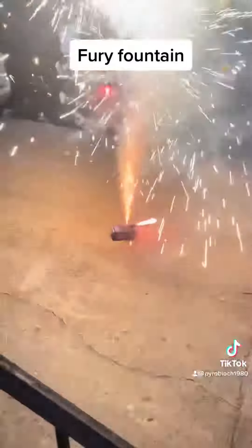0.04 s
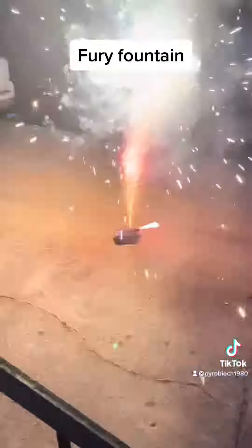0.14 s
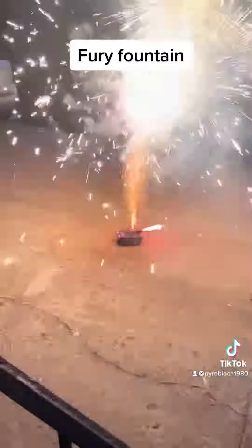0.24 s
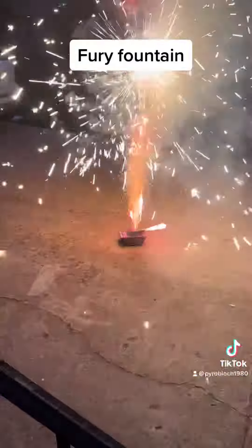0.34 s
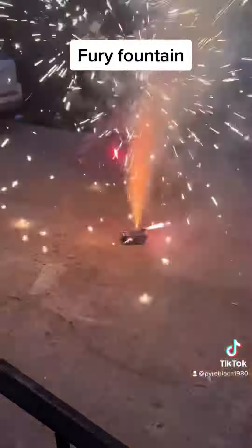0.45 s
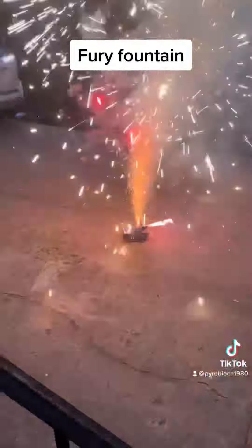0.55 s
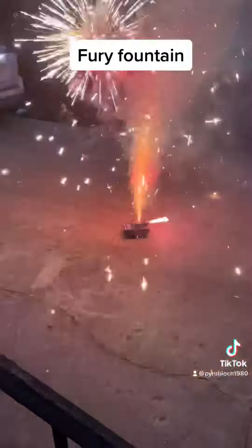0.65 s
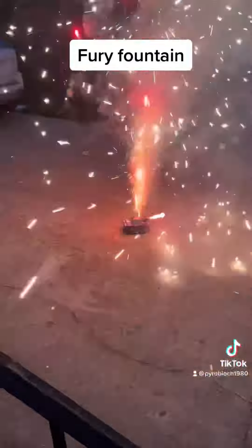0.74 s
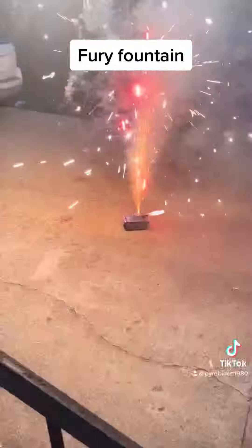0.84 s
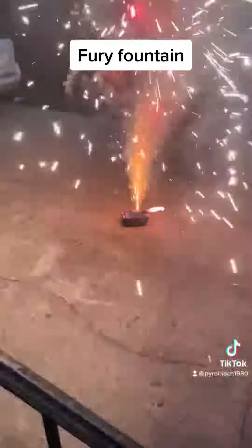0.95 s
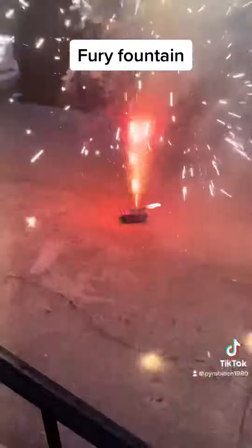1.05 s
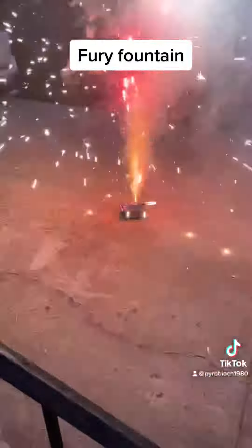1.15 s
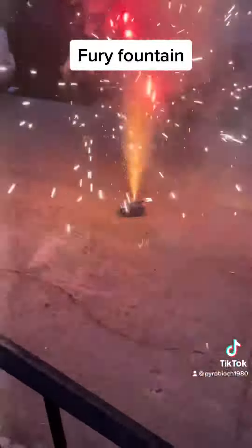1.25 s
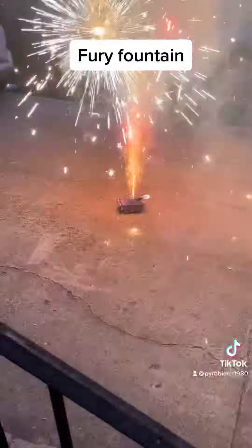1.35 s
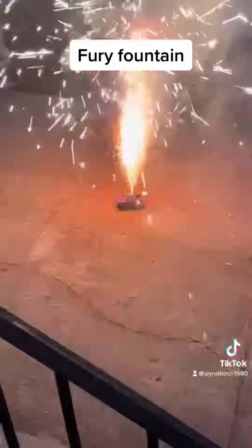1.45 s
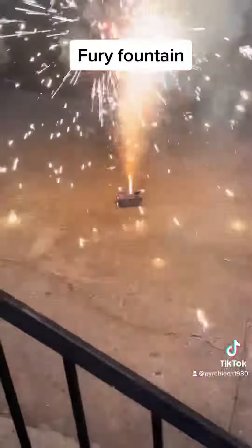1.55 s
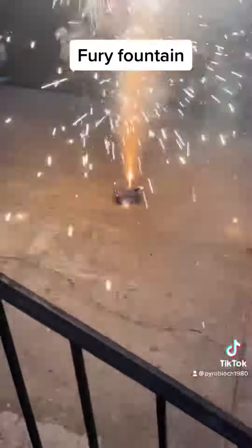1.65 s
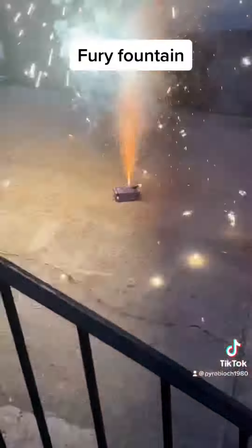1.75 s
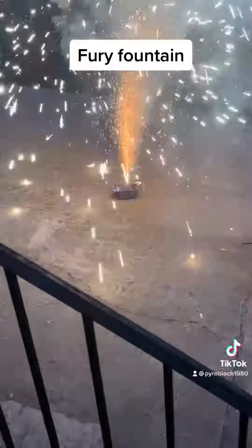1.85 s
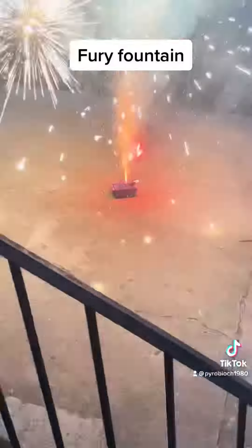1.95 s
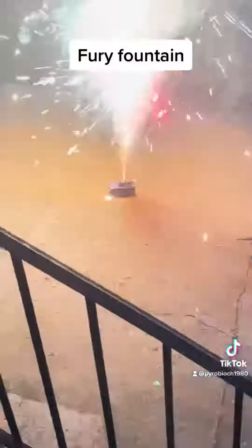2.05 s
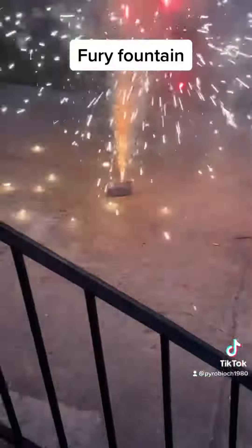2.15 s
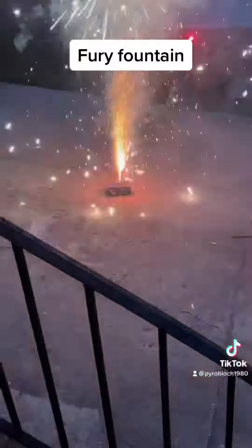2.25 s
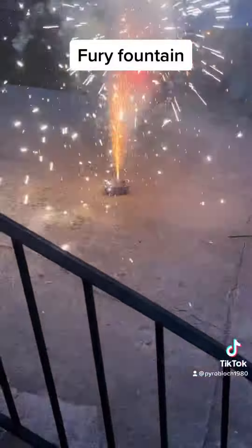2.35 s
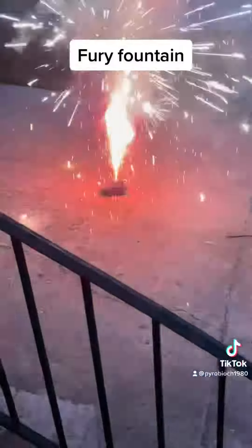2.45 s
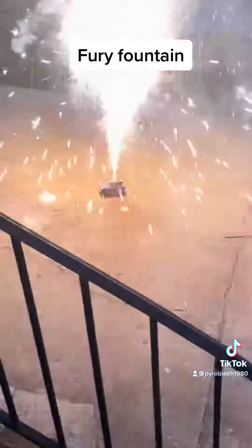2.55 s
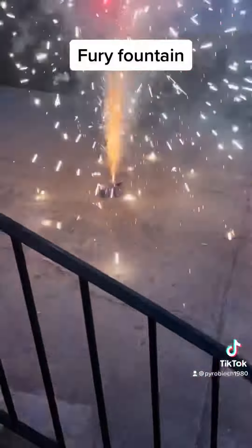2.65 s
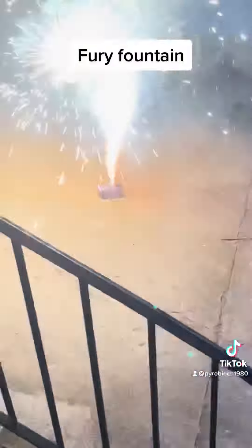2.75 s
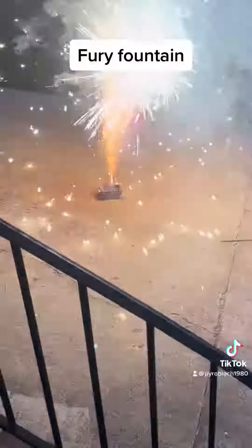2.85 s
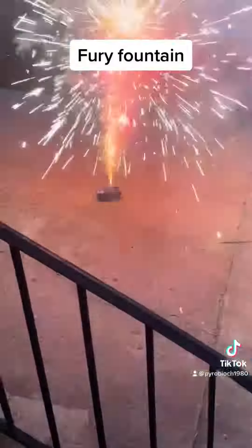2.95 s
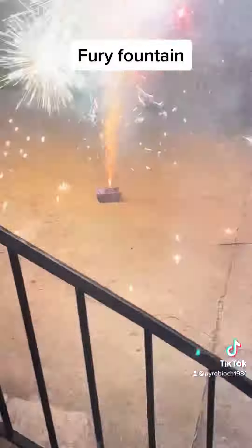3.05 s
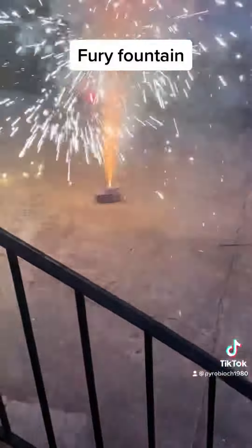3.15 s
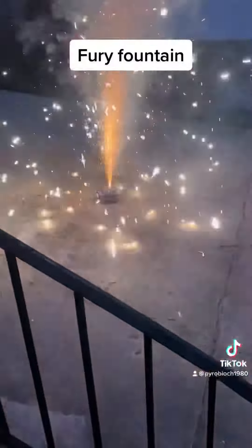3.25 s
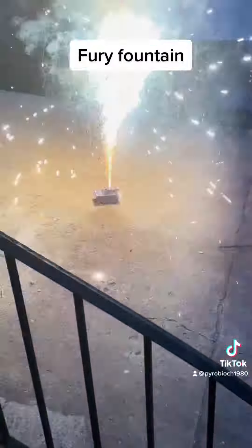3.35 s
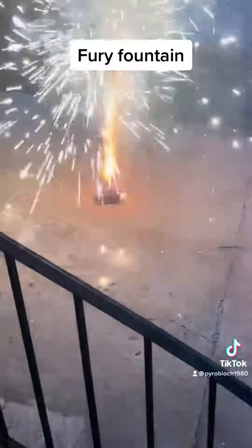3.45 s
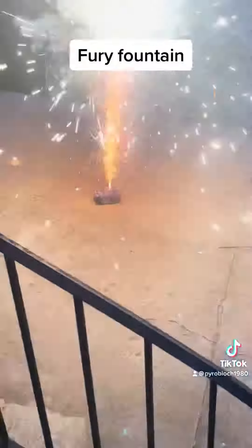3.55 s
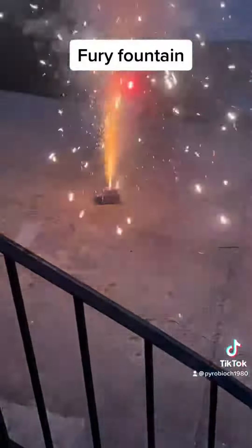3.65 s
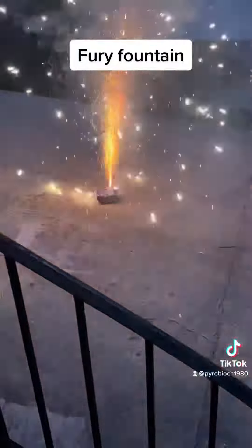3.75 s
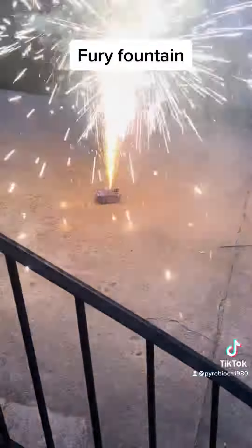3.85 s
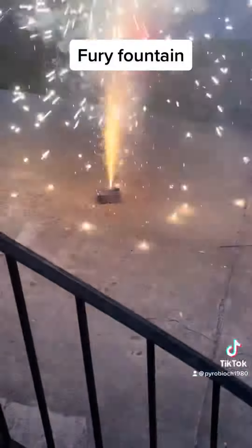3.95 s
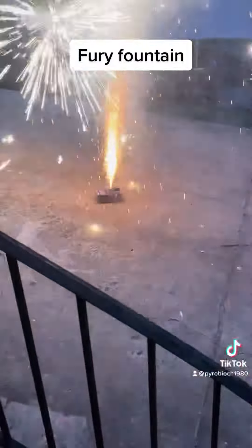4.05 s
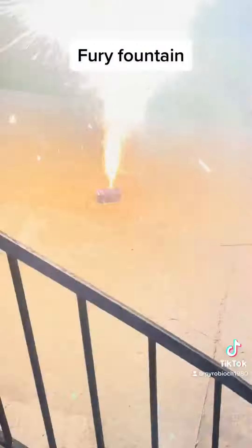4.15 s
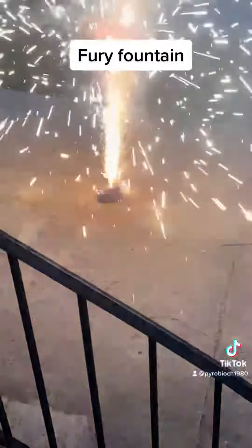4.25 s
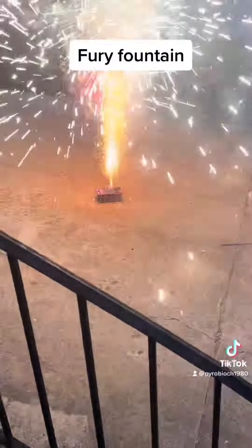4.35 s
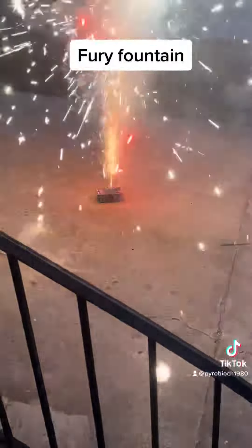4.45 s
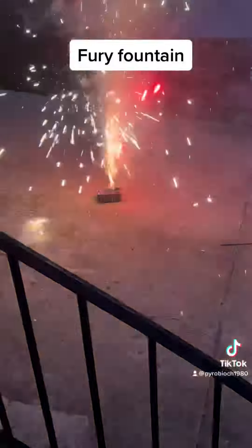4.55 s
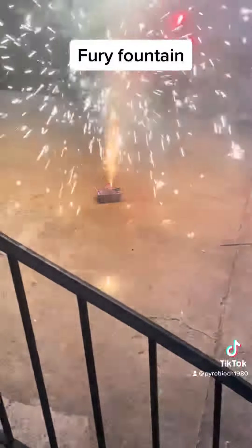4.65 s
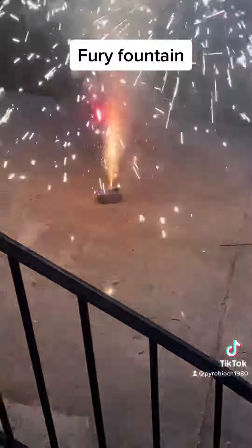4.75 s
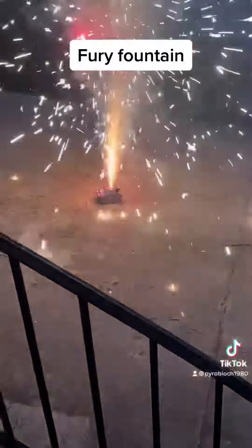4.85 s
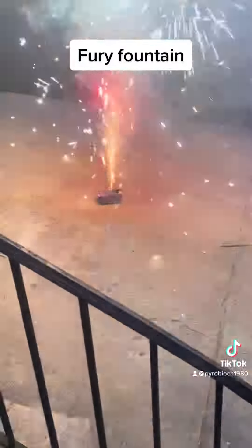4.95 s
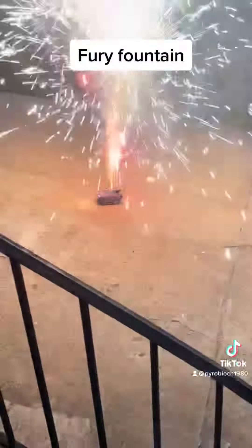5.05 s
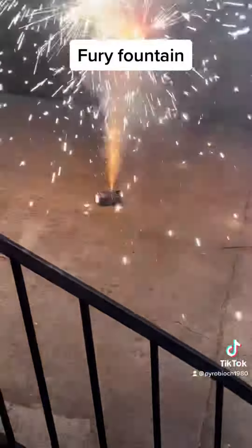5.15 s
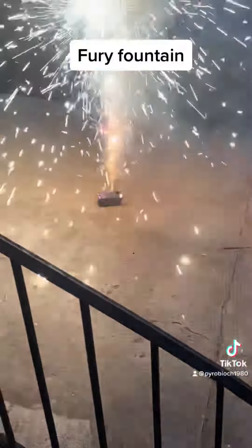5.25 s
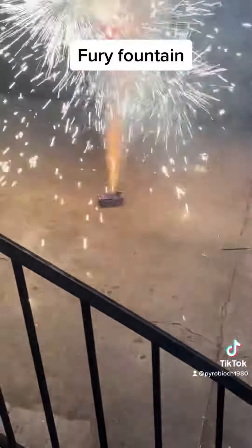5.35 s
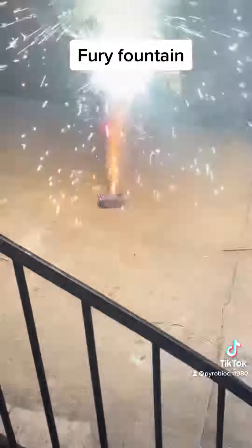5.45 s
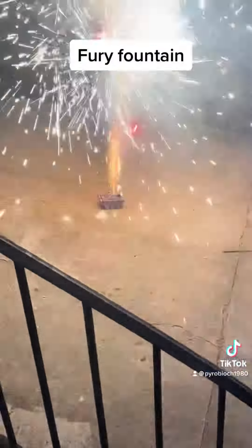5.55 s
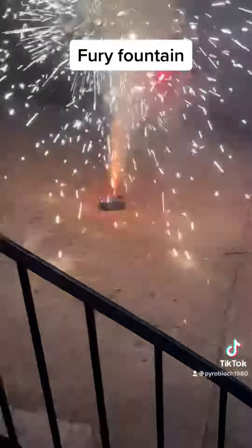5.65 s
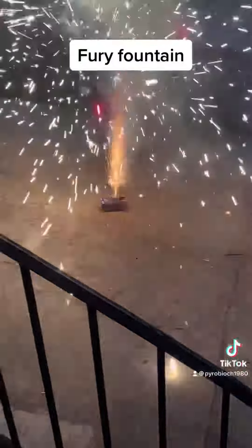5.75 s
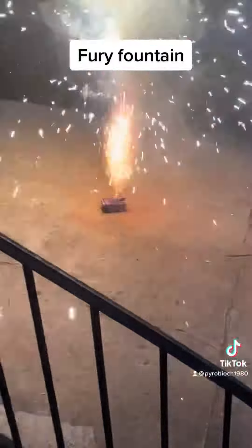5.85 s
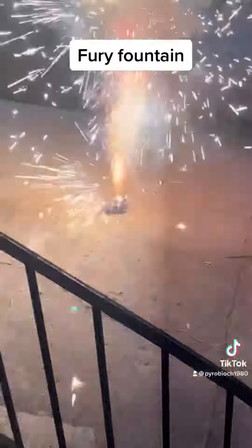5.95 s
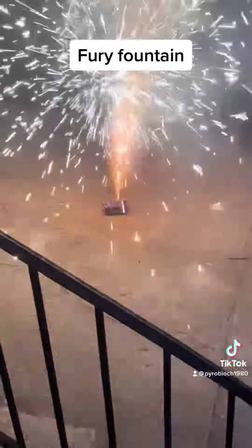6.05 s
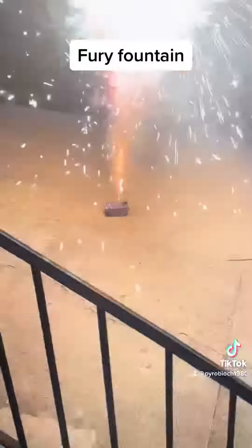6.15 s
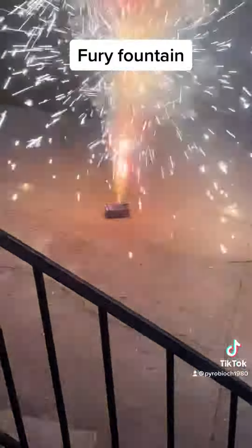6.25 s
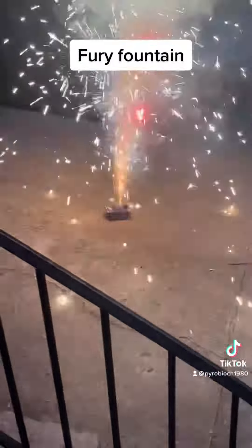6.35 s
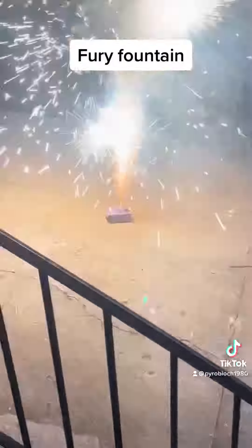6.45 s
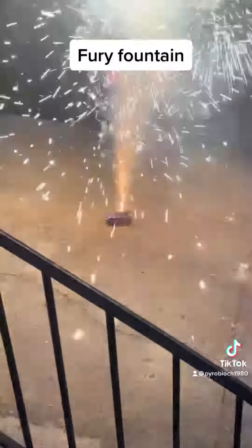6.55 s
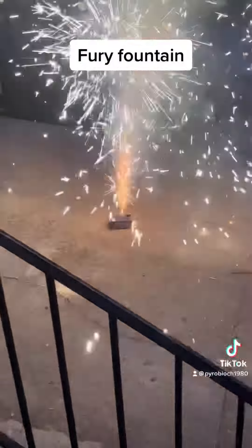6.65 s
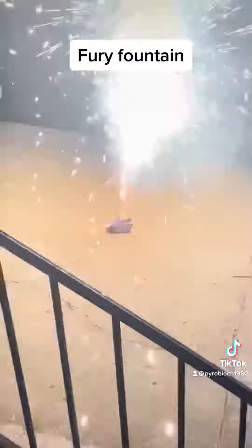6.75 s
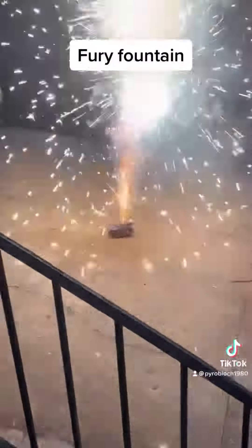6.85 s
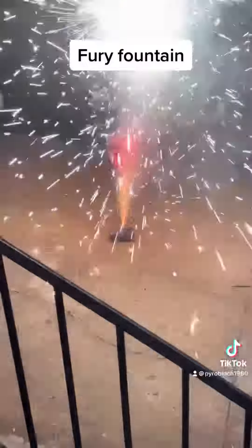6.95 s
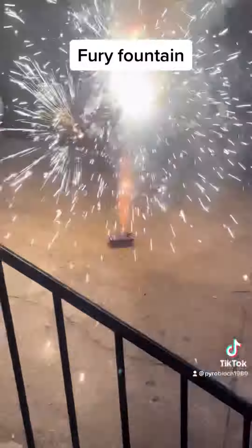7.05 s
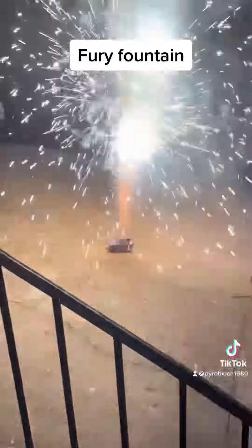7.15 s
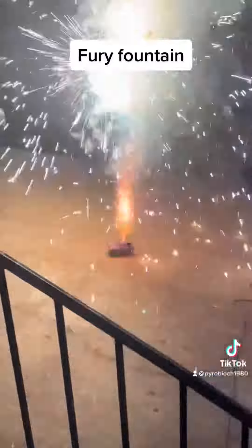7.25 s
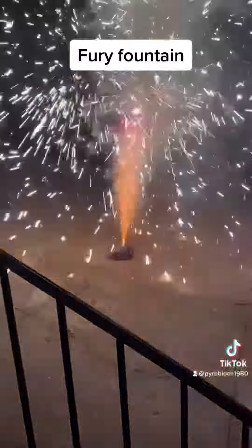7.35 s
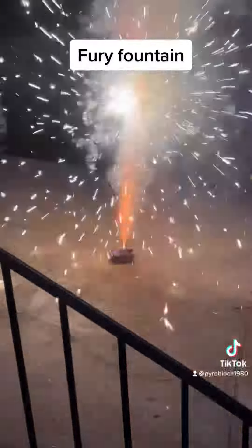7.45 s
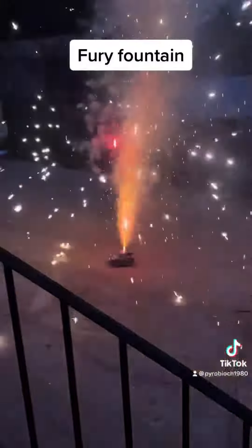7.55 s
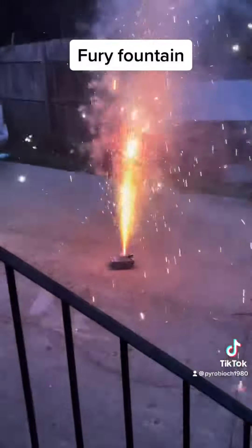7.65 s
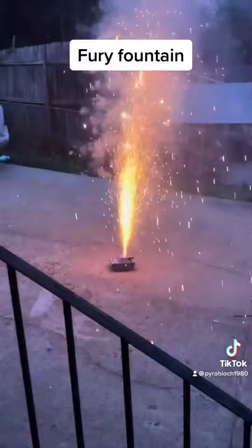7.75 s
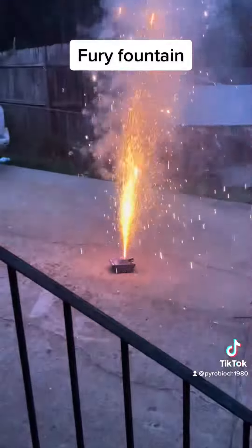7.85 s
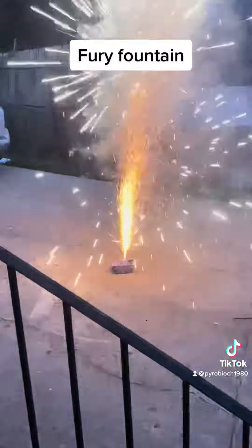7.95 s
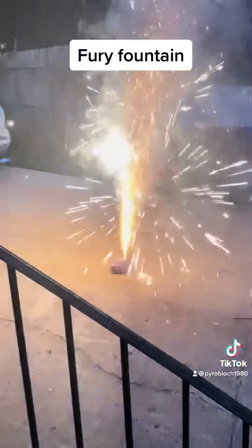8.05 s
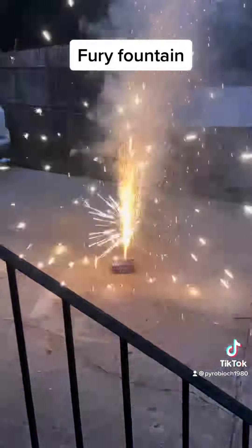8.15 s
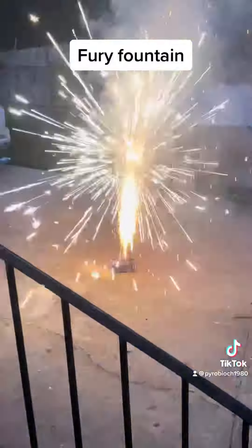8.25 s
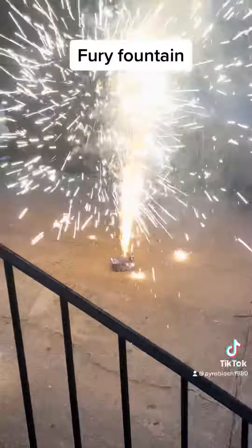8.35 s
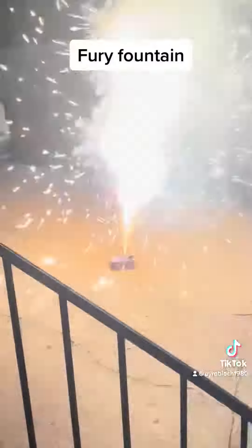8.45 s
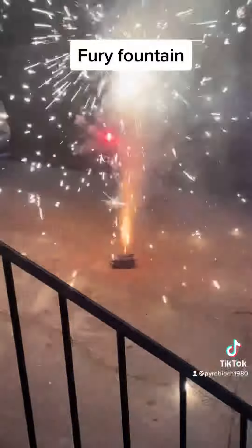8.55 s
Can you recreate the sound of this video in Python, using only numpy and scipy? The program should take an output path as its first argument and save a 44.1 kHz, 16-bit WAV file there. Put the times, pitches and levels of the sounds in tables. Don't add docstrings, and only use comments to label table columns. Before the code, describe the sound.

A ground firework fountain crackles outdoors in dense, bright, dry volleys of sharp pops, with hard paving slaps, occasional low thumps and faint hiss.

```python
import sys
import numpy as np
from scipy import signal
from scipy.fft import rfft, irfft, next_fast_len
from scipy.io import wavfile

SR = 44100
rng = np.random.default_rng(int(sys.argv[2]) if len(sys.argv) > 2 else 0)


def boost(x):
    u = np.asarray(x, float) / 20
    return 10 ** u


def pcm_store(signal):
    levels = np.round(np.clip(np.atleast_2d(signal), -1, 1) * 32767)
    wavfile.write(sys.argv[1], SR, levels.astype(np.int16).T)


N = 379701
SIZE = next_fast_len(N + 2 * SR)
HZ = np.maximum(np.arange(SIZE // 2 + 1) * SR / SIZE, 10)


def at_hz(points, hz):
    table_hz, values = np.transpose(points)
    return np.interp(np.log(hz), np.log(table_hz), values)


def clicks(seconds, sizes):
    samples = np.clip(np.round(seconds * SR).astype(int), 0, N - 1)
    return rfft(np.bincount(samples, sizes, N), SIZE)


def colour(points):
    cepstrum = irfft(np.log(boost(at_hz(points, HZ))), SIZE)
    cepstrum[1:SIZE // 2] *= 2
    cepstrum[SIZE // 2:] = 0
    response = np.exp(rfft(cepstrum))
    return response / np.abs(irfft(response, SIZE)).max()


def wash(t60_table, seconds, start_s):
    t = np.arange(int(seconds * SR)) / SR
    edges = 40 * 2. ** np.arange(10)
    cloud = 0
    for low, high in zip(edges, edges[1:]):
        octave = signal.butter(2, [low, high], "band", fs=SR, output="sos")
        band = signal.sosfilt(octave, rng.standard_normal(len(t)))
        cloud = cloud + band * boost(-60 * t / at_hz(t60_table, np.sqrt(low * high)))
    cloud = cloud * np.clip(t / start_s, 0, 1) ** 2
    return rfft(cloud / np.sqrt(np.sum(cloud ** 2)), SIZE)


# start in seconds, length in seconds, star level in dB.
VOLLEYS = [(0.003, 0.055, -9), (0.09, 0.018, -9), (0.156, 0.031, -9), (0.219, 0.0063, -13),
           (0.236, 0.088, -9.5), (0.336, 0.015, -11.5), (0.376, 0.015, -9.5), (0.406, 0.007, -9),
           (0.434, 0.0042, -9.5), (0.471, 0.026, -11), (0.53, 0.071, -10), (0.641, 0.0053, -14.5),
           (0.669, 0.0035, -4), (0.692, 0.013, -6), (0.734, 0.0012, -12.5), (0.76, 0.018, -11.5),
           (0.8, 0.024, -11), (0.85, 0.061, -8.5), (0.93, 0.011, -13), (0.957, 0.013, -8),
           (0.989, 0.026, -11), (1.052, 0.038, -10.5), (1.11, 0.0061, -10.5), (1.152, 0.0085, -24),
           (1.168, 0.002, -15.5), (1.198, 0.01, -10), (1.259, 0.005, -12.5), (1.307, 0.019, -13),
           (1.35, 0.005, -5.5), (1.375, 0.014, -6.5),
           (1.419, 0.012, -7), (1.471, 0.022, -7.5), (1.544, 0.034, -8.5), (1.619, 0.0, -5),
                     (1.644, 0.015, -9), (1.676, 0.0027, -12.5), (1.718, 0.0018, -12),
                     (1.762, 0.059, -10.5), (1.871, 0.0, -15), (1.907, 0.0, -10.5), (1.947, 0.019, -9.5),
                     (1.988, 0.022, -17.5), (2.023, 0.01, -9), (2.054, 0.0055, -6), (2.08, 0.044, -8.5),
                     (2.174, 0.0, -10.5), (2.24, 0.01, -14.5), (2.27, 0.023, -11.5),
                     (2.333, 0.00043, -11.5), (2.403, 0.0042, -11), (2.429, 0.0084, -13),
                     (2.466, 0.026, -12.5), (2.502, 0.0, -8), (2.544, 0.005, -6), (2.587, 0.031, -9.5),
                     (2.665, 0.012, -9.5), (2.696, 0.0091, -10.5), (2.716, 0.058, -9), (2.844, 0.0093, -11),
                     (2.882, 0.021, -10),
           (2.922, 0.029, -8.5), (2.978, 0.019, -7.5), (3.037, 0.025, -9), (3.107, 0.028, -13),
                 (3.163, 0.0044, -13), (3.182, 0.002, -7.5), (3.278, 0.016, -11), (3.363, 0.028, -11),
                 (3.428, 0.012, -9), (3.479, 0.0, -12), (3.509, 0.0043, -10), (3.535, 0.006, -17.5),
                 (3.555, 0.02, -8.5), (3.615, 0.002, -5), (3.668, 0.0, -4.5), (3.703, 0.0, -10),
                 (3.767, 0.021, -10.5), (3.812, 0.022, -9), (3.866, 0.003, -15), (3.89, 0.026, -11),
                 (3.934, 0.0042, -8), (4.039, 0.0029, -12.5), (4.148, 0.016, -8.5), (4.19, 0.024, -6.5),
                 (4.276, 0.074, -10), (4.367, 0.006, -12), (4.394, 0.024, -10), (4.453, 0.037, -14.5),
                 (4.496, 0.012, -8), (4.556, 0.03, -14.5),
           (4.584, 0.086, -9), (4.684, 0.033, -7.5), (4.754, 0.063, -9), (4.853, 0.032, -10.5),
                 (4.92, 0, -11.5), (4.941, 0.075, -9.5), (5.024, 0.091, -8.5), (5.134, 0.0099, -5),
                 (5.17, 0.026, -9.5), (5.214, 0.026, -9), (5.25, 0.15, -10.5), (5.411, 0.019, -6),
                 (5.429, 0.042, -11), (5.492, 0.14, -8), (5.648, 0.022, -11.5), (5.667, 0.058, -8.5),
                 (5.746, 0.04, -8), (5.805, 0.0036, -15), (5.825, 0.045, -12), (5.886, 0.042, -9.5),
                 (5.947, 0, -5), (5.971, 0.051, -9), (6.063, 0.037, -13), (6.102, 0.025, -32),
                 (6.12, 0.044, -8.5), (6.182, 0.0093, -8), (6.208, 0.033, -7), (6.26, 0.065, -9.5),
                 (6.339, 0.12, -10.5), (6.479, 0.017, -10),
           (6.51, 0.063, -10), (6.589, 0.105, -11), (6.726, 0.035, -9.5), (6.744, 0.051, -11.5),
                   (6.817, 0.052, -11.5), (6.873, 0.073, -9.5), (6.964, 0.012, -7.5), (6.996, 0.087, -8.5),
                   (7.106, 0.0035, -9), (7.126, 0.025, -12), (7.146, 0.01, -13), (7.177, 0.029, -11),
                   (7.233, 0.097, -10), (7.36, 0.054, -12), (7.444, 0.015, -14), (7.883, 0.0, -14),
                   (7.92, 0.0013, -13), (7.959, 0.0023, -10), (8.036, 0.0, -10), (8.068, 0.006, -7),
                   (8.147, 0.0, -20.5), (8.17, 0.011, -9.5), (8.193, 0.011, -9), (8.244, 0.0, -5.5),
                   (8.285, 0.054, -8.5), (8.368, 0.05, -9), (8.436, 0.027, -8), (8.48, 0.017, -8.5),
                   (8.521, 0.0, -6.5), (8.543, 0.057, -8.5),
           (.665, 0, -7),
    (1.759, 0, -6),
    (1.867, 0, -12),
    (2.665, 0.0033, -16),
    (3.108, 0, -12),
    (3.274, 0.00062, -12),
    (3.361, 0, -12.5),
    (3.666, 0.0023, -18),
    (8.033, 0, -7.5),
    (8.316, 0.0037, -8),
]
STAR_GAP_S, STAR_JITTER, MOST_STARS = 0.008, 0.4, 18
STAR_SPREAD_DB, LEAD_DB = 4.5, 1


def stars():
    volleys = np.array(VOLLEYS)
    start, length, db = volleys.T[..., None]
    luck = rng.standard_normal((len(start), 2, MOST_STARS))
    k = np.arange(MOST_STARS)
    gaps = np.minimum(np.round(length / STAR_GAP_S), MOST_STARS - 1)
    inside = (k > 0) & (k < gaps)
    place = (k + STAR_JITTER * np.tanh(luck[:, 0]) * inside) / np.maximum(gaps, 1)
    star_db = STAR_SPREAD_DB * np.minimum(luck[:, 1], 1.3) + LEAD_DB * (k == 0)
    power = boost(2 * star_db) * (k <= gaps)
    power = power / power.sum(axis=1, keepdims=True) * (1 + length / STAR_GAP_S)
    seconds = start + length * np.minimum(place, 1)
    return seconds.ravel(), (db + 10 * np.log10(power + 1e-20)).ravel()


SPARK_DB = -22.5


def stars_and_sparks():
    star_s, star_db = stars()
    luck = rng.random((len(star_s), 4))
    spark_s = star_s + 0.004 + 0.014 * luck[:, :2].T
    spark_db = star_db + SPARK_DB + 12 * luck[:, 2:].T
    return np.r_[star_s, spark_s.ravel()], np.r_[star_db, spark_db.ravel()]


BOUNCE_S, BOUNCE_DB = 0.0036, -6.5
WALL_S, WALL_DB = 0.0051, -12


def paths(seconds, sizes):
    luck = rng.standard_normal((len(seconds), 9))
    bounce = seconds + BOUNCE_S * np.exp(0.15 * luck[:, 0])
    wall = seconds + WALL_S * np.exp(0.12 * luck[:, 1])
    at = np.array([seconds, bounce, wall])
    path_db = [0 * seconds, BOUNCE_DB + 1.5 * luck[:, 2], WALL_DB + 2.7 * luck[:, 2]]
    size = sizes * boost(path_db)
    at_across = at + 6e-5 * luck[:, 3:6].T
    return (at, size), (at_across, size * np.sign(luck[:, 6:].T))


JET_DB = -60


def jet_hiss(sky):
    noise = rfft(rng.standard_normal(N), SIZE)
    return boost(JET_DB) * noise * sky * np.sqrt(HZ / HZ[-1])


# frequency in Hz, level in dB per Hz.
POP_SUM = [(30, -25), (63, -2), (135, -5), (283, -11.5), (500, -5.5), (900, -5), (1530, -7), (4100, -3.5),
           (7400, -11), (9200, -18), (11300, -21), (13400, -9), (15700, -23), (16100, -40.5)]
# frequency in Hz, level in dB per Hz.
POP_ACROSS = [(40, -48), (350, -61), (600, -17), (1170, 2.5), (1940, -1.5), (2900, 7), (5600, -3),
              (8600, -2), (12800, -4.5), (15700, -17), (16100, -43)]
# frequency in Hz, 60 dB decay time in seconds.
NEAR_T60 = [(100, 0.17), (300, 0.052), (800, 0.054), (4000, 0.13), (13000, 0.042)]
# frequency in Hz, 60 dB decay time in seconds.
STREET_T60 = [(200, 0.56), (3000, 1.25), (9000, 1.27), (13000, 0.43)]
POP_DB, ACROSS_DB = -3, -2.5
NEAR_DB, STREET_DB, SCATTER_DB = -3, -15, 2
OPEN_SKY_HZ, BEARINGS = 240, 5


def crackle():
    s, db = stars_and_sparks()
    sizes = -boost(db + POP_DB)
    sky = HZ / np.hypot(HZ, OPEN_SKY_HZ)
    tones = [colour(POP_SUM), boost(ACROSS_DB) * colour(POP_ACROSS)]
    ports = []
    for (at, size), tone in zip(paths(s, sizes), tones):
        street = boost(STREET_DB) * sky * sky * wash(STREET_T60, 1.9, start_s=0.02)
        total = clicks(s, sizes) * street + jet_hiss(sky)
        for k in range(BEARINGS):
            mine = slice(k, None, BEARINGS)
            scatter = 1 + boost(SCATTER_DB) * wash([(100, 0.0062), (13000, 0.0092)], 0.02, start_s=1e-4)
            walls = boost(NEAR_DB) * sky * wash(NEAR_T60, 0.3, start_s=0.0026)
            total += clicks(at[:, mine].ravel(), size[:, mine].ravel()) * scatter
            total += clicks(s[mine], sizes[mine]) * walls
        ports.append(irfft(total * tone, SIZE)[:N])
    return np.array(ports)


# start in seconds, peak level of the thump in dB, extra deep bass in dB.
BIG_STARS = [(.25, -19, -23), (1.355, -13, -17), (1.568, -31, 7), (2.094, -11, -7), (2.294, -38, 14),
             (2.589, -11, -5), (2.673, -22.5, 8), (4.616, -32, 16), (4.982, -15.5, -5), (5.338, -12.5, -9),
             (5.439, -18.5, 6), (5.517, -13, -21), (6.149, -21.5, 8.5), (6.214, -16, 13), (6.527, -14, -5),
             (6.624, -20.5, 2), (6.944, -25, 8.5), (7.152, -23.5, -5), (7.32, -14, -10)]
# frequency in Hz, level in dB per Hz.
THUMP_COLOUR = [(30, -11), (70, 1.5), (250, -5), (600, -2.5), (1200, -8.5), (4000, -19), (9000, -56.5)]
THUMP_DB, DEEP_HZ = 6.5, 164
THUMP_SWAY = 0.17


def thumps():
    s, db, deep_db = np.transpose(BIG_STARS)
    deep = 1 / (1 + 1j * HZ / DEEP_HZ) ** 2
    tone = colour(THUMP_COLOUR)
    sway = THUMP_SWAY * rng.choice([-1, 1], len(s))
    ports = []
    for share in (np.ones(len(s)), sway):
        sizes = -boost(db + THUMP_DB) * share
        extra_bass = deep * clicks(s, sizes * (boost(deep_db) - 1))
        ports.append(irfft(tone * (clicks(s, sizes) + extra_bass), SIZE)[:N])
    return np.array(ports)


LEFT_DB = 0.24


def scene():
    mid, side = crackle() + thumps()
    return np.array([mid + side, mid - side]) * boost([[LEFT_DB], [-LEFT_DB]])


# start in seconds, end in seconds, gain below the treble in dB.
WIND_DIPS = [
    (0.262, 0.458, -12),
    (1.372, 1.519, -21.5),
    (2.111, 2.15, -14.5),
    (2.611, 2.642, -26),
    (5.003, 5.15, -26.5),
    (5.366, 5.426, -25.5),
    (5.532, 5.554, -21.5),
    (6.545, 6.617, -10.5),
    (6.638, 6.672, -16),
    (7.341, 7.453, -14),
]
SUPPRESS_HZ, BASS_TOP_HZ, LOW_MID_TOP_HZ = 7640, 244, 995
SLIDE_S, SMEAR_DB, SMEAR_T60_S, BASS_LAG_TURNS = 0.018, -19, 0.046, 0.87
HOLD_S, LET_GO_S, LOW_MID_DB, HELD_LOW_MID_DB = 0.19, 1, 4, -8
WAKE_S, WAKE_LOW_MID_DB = 0.22, -4.5
BASS_DB, HELD_BASS_DB, BASS_LET_GO_S, BASS_DIP_SHARE = -2, 12.5, 0.2, 0.29
DENSE_FROM_S, DENSE_BASS_DB = 4.4, 3


def suppressor(x):
    t = np.arange(N) / SR
    spectrum = rfft(x, SIZE)
    dip_db = 0
    for start, end, db in WIND_DIPS:
        dip_db = dip_db + db * np.clip(np.minimum(t - start, end - t) / SLIDE_S + 0.5, 0, 1)
    held = np.clip(1 - (t - HOLD_S) / LET_GO_S, 0, 1)
    low_mid_db = LOW_MID_DB + HELD_LOW_MID_DB * held + WAKE_LOW_MID_DB * (t < WAKE_S)
    bass_db = BASS_DB + HELD_BASS_DB * np.clip(1 - t / BASS_LET_GO_S, 0, 1)
    bass_db = bass_db + DENSE_BASS_DB * np.clip((t - DENSE_FROM_S) / 0.23, 0, 1)
    bass_db = bass_db - (1 - BASS_DIP_SHARE) * dip_db
    below = 1 / (1 + (HZ / SUPPRESS_HZ) ** 40)
    bass = 1 / (1 + (HZ / BASS_TOP_HZ) ** 6)
    low = 1 / (1 + (HZ / LOW_MID_TOP_HZ) ** 6)
    turned = irfft(spectrum * (1 - below), SIZE)[:, :N]
    for band, db in [(below - low, 0), (low - bass, low_mid_db), (bass, bass_db)]:
        turned = turned + boost(dip_db + db) * irfft(spectrum * band, SIZE)[:, :N]
    smear = wash([(100, SMEAR_T60_S), (9000, SMEAR_T60_S)], 0.02, start_s=1e-4)
    ahead = 1 + boost(SMEAR_DB) * np.conj(smear)
    lag = 2 * np.pi * BASS_LAG_TURNS * (np.log(HZ / HZ[-1]) - HZ / HZ[-1])
    return irfft(rfft(turned, SIZE) * ahead * np.exp(-1j * lag), SIZE)[:, :N]


def roll_off(x):
    return signal.sosfilt(signal.butter(12, 16680, fs=SR, output="sos"), x)


def record(dry):
    rounded = 1.3 * np.tanh(suppressor(dry) / 0.75)
    top_cut = signal.cheby2(12, 60, 16900, fs=SR, output="sos")
    return roll_off(signal.sosfilt(top_cut, rounded))


dry = scene()
out = record(dry)
pcm_store(out)
```